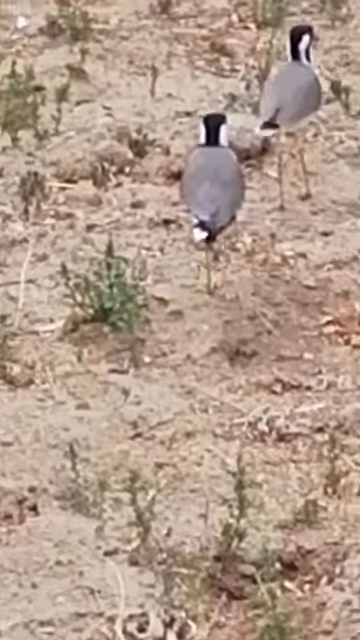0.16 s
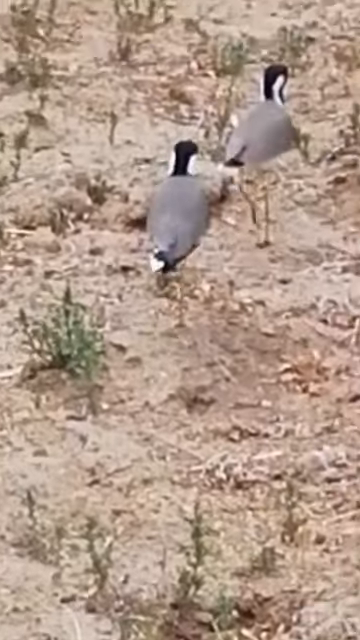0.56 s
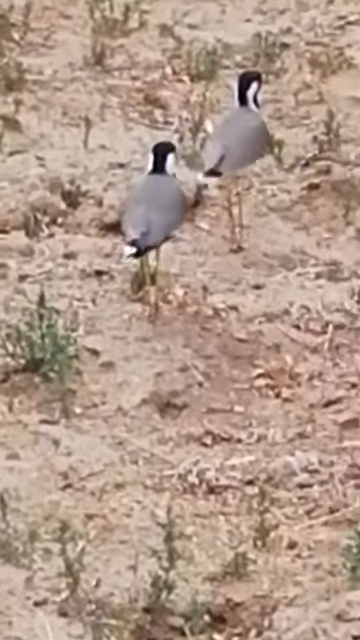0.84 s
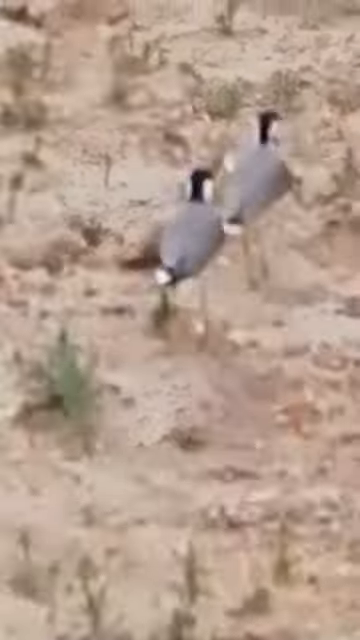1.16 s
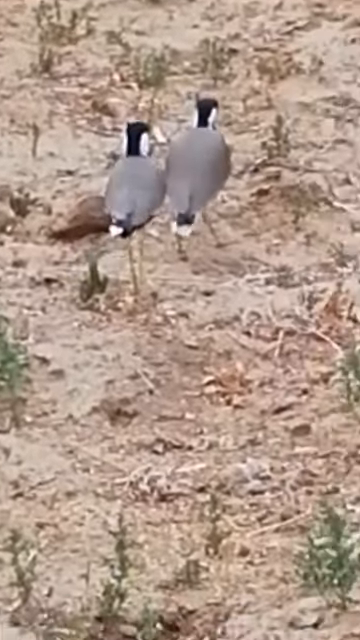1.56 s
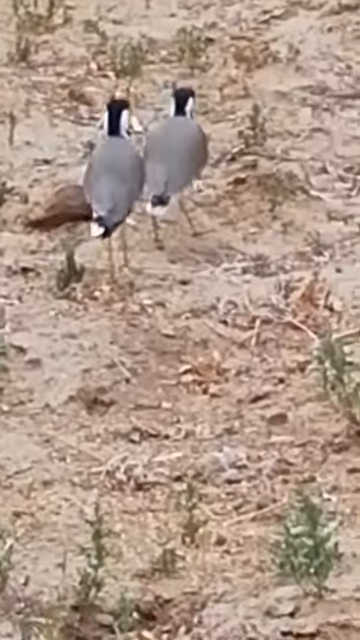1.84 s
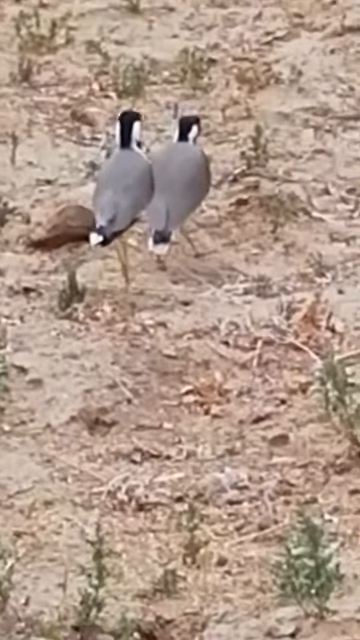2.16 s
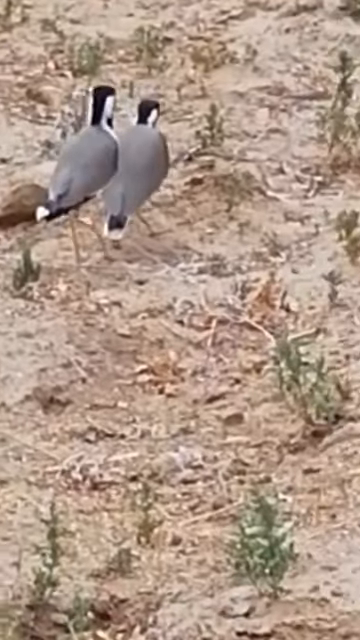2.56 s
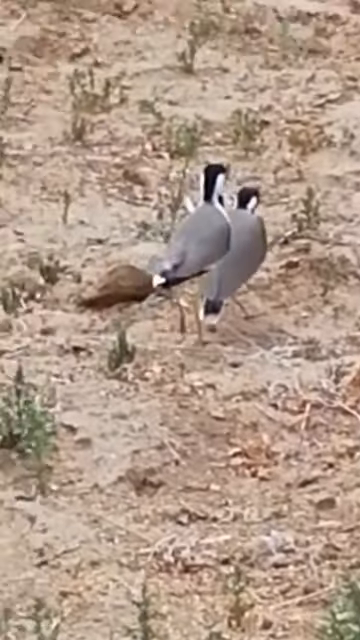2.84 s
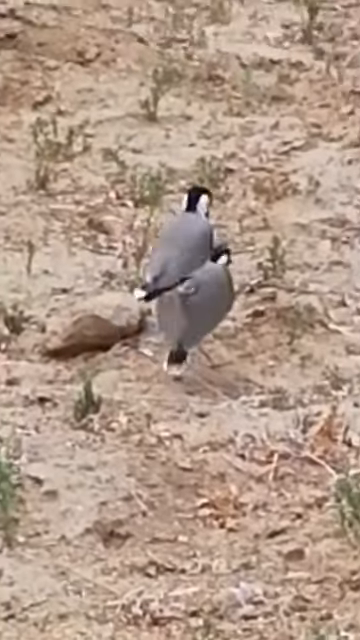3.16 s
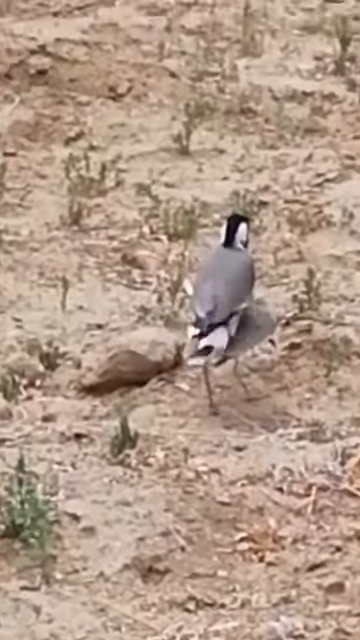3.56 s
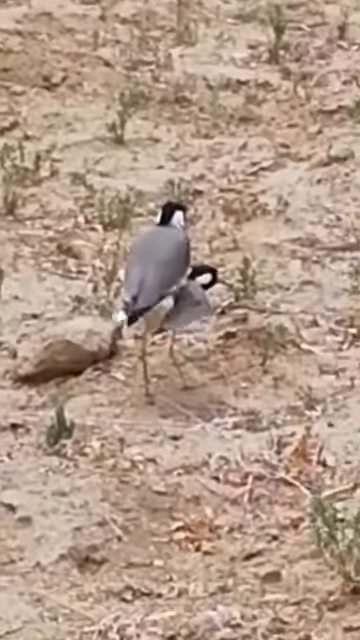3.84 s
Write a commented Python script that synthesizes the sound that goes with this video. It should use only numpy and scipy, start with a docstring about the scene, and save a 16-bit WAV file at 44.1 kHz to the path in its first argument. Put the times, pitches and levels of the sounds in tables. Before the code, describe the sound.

Lapwing calls on open dry ground: after brief silence, a faint kek, then steady rapid ticks swelling with sharper keks between, ending in brighter pips; faint distant chirps, soft air hush and wind rumbling on the microphone.

```python
"""After a short silence, wind and open-air hush start abruptly, with a sharp lapwing 'kek' close behind.
Lapwing ticks grow louder with keks between them, then quick pips take over; other birds whistle and chirp
farther off while gusts rumble. Lapwing calls are harmonic pulses and rasp through a throat filter, far birds
are wavering sine partials, wind is shaped noise with single low pushes; scattered taps make the echoes."""
import sys
import numpy as np
from scipy import signal
from scipy.fft import rfft, irfft
from scipy.io import wavfile
from scipy.ndimage import uniform_filter1d

SR = 44100
rng = np.random.default_rng(int(sys.argv[2]) if len(sys.argv) > 2 else 0)


def store_wav(level_fs):
    """Save 16-bit WAV to argv[1]."""
    pcm = np.round(np.clip(np.atleast_2d(level_fs), -1, 1) * 32767)
    wavfile.write(sys.argv[1], SR, pcm.T.astype(np.int16))


N = 176400
T = np.arange(N) / SR

# Echo decay of the open field. Each row: frequency in Hz, time to fall 60 dB in s.
FIELD_T60 = [(500, 0.35), (3000, 0.61), (5200, 0.64), (8000, 1), (15000, 0.23)]


def amp(db):
    """Decibels to gain."""
    return 10 ** (np.asarray(db) / 20)


def evened(x):
    """Scales to rms 1."""
    return x / np.sqrt(np.mean(x ** 2) + 1e-20)


def read(points, hz):
    """Interpolates a curve on a log-frequency axis."""
    f, value = np.transpose(points)
    return np.interp(np.log(hz + 1), np.log(f + 1), value)


def add(mix, start_s, sound):
    """Mixes a sound in at start_s, cut at the end of the mix."""
    part = mix[..., round(start_s * SR):][..., :sound.shape[-1]]
    part += sound[..., :part.shape[-1]]


def waver(size, hz):
    """Smooth random drift: noise of rms 1 under a Gaussian low-pass of width hz."""
    f = np.fft.rfftfreq(16384, 1 / SR)
    spectrum = rfft(rng.standard_normal(2 * len(f) - 2))
    return evened(irfft(spectrum * np.exp(-(f / hz) ** 2)))[:size]


def noise(points, same, patchy_db):
    """Stereo noise with a spectrum, a left-right likeness and drifting patches."""
    hz = np.fft.rfftfreq(2048, 1 / SR)
    a, b, c, d, patches = rng.standard_normal((5, len(hz), N // 512 + 5))
    likeness = np.clip(read(same, hz), -1, 1)[:, None]
    left = a + 1j * b
    right = likeness * left + np.sqrt(1 - likeness ** 2) * (c + 1j * d)
    patches = uniform_filter1d(patches, size=8, axis=1)  # over time
    patches = evened(uniform_filter1d(patches, size=14, axis=0))  # over frequency
    z = np.array([left, right]) * amp(read(points, hz)[:, None] + patchy_db * patches)
    return evened(signal.istft(z, nperseg=2048, noverlap=1536)[1][:, :N])


def echoes(x, t60):
    """Scattered reflections, different on each side, each band dying at its own speed."""
    kept = rng.standard_normal((2, SR)) * (rng.random((2, SR)) < .1)
    taps = kept * (np.arange(SR) > 60)
    hz, t, z = signal.stft(taps, SR, nperseg=256)
    decay = amp(-60 * t / read(t60, hz)[:, None])
    tail = signal.istft(z * decay, SR, nperseg=256)[1]
    band = abs(rfft(tail[0], SR))[2000:6000]  # 1 Hz bins: unit gain at 2-6 kHz
    tail = tail / np.sqrt(np.mean(band ** 2))
    return signal.fftconvolve(np.atleast_2d(x), tail, axes=1)[:, :N]


def wind():
    """Low buffeting noise that changes colour in the gusts, over the hush of open air."""
    # Gust level. Each row: time in s, level before trim in dB.
    gusts = [(0.45, -61), (0.93, -66.5), (1.04, -53.5), (1.06, -67), (1.59, -59), (1.62, -50.5),
             (1.77, -64.5), (1.96, -51.5), (2.01, -59), (2.41, -56), (2.47, -67), (2.56, -44.5),
             (2.67, -51), (2.74, -45), (2.77, -50.5), (2.86, -46), (2.9, -35), (2.94, -48), (3.06, -39.5),
             (3.08, -51.5), (3.12, -40.5), (3.24, -38.5), (3.31, -49.5), (3.36, -56.5), (3.47, -25.5),
             (3.5, -39), (3.6, -32), (3.64, -38), (3.67, -34.5), (3.81, -56.5), (3.83, -43.5), (4.0, -44.5)]
    # Rumble spectra, calm and gusty. Each row: frequency in Hz, relative level in dB.
    calm_spectrum = [(20, -9.5), (40, 7), (65, 7), (85, 4.5), (110, -10.5), (220, -15), (300, -29),
                     (500, -26), (1100, -69)]
    gusty_spectrum = [(20, -6.5), (40, -2), (62, 2.5), (100, -6.5), (150, -10), (240, -19), (330, -32.5),
                      (500, -45.5), (1000, -75), (3000, -90)]
    # Hush spectrum. Each row: frequency in Hz, relative level in dB.
    air_spectrum = [(100, 12.5), (300, 4.5), (600, -1), (1150, 3), (1700, -3), (2400, -5.5), (3500, -15.5),
                    (5000, -10), (7000, -13), (10000, -18.5), (15000, -20)]
    # Hush level. Each row: time in s, level in dB.
    air_level = [(.4, -73), (.7, -70), (1.0, -66), (1.45, -60.5), (2.1, -61.5), (2.8, -57.5), (3.5, -55.5),
                 (4, -58)]
    # Hush left-right likeness. Each row: frequency in Hz, correlation from -1 to 1.
    air_same = [(60, 0.99), (150, 1), (380, 0.28), (950, 0.66), (2380, 0.64), (5980, 0.22), (15000, -0.072)]
    calm_db, gusty_db, trim_db = -51.5, -37, 0.5
    level_db = np.interp(T, *np.transpose(gusts))
    gusty = np.clip((level_db - calm_db) / (gusty_db - calm_db), 0, 1)
    same = [(30, .97), (70, .93), (130, .7), (250, .2)]  # Hz, correlation
    rumble = np.sqrt(1 - gusty) * noise(calm_spectrum, same, patchy_db=1.5)
    rumble = rumble + np.sqrt(gusty) * noise(gusty_spectrum, same, patchy_db=3.0)
    rumble /= np.sqrt(uniform_filter1d((rumble ** 2).mean(0), size=3000))  # level then follows gusts
    hush = amp(np.interp(T, *np.transpose(air_level))) * noise(air_spectrum, air_same, patchy_db=1.92)
    return amp(level_db + trim_db) * rumble + hush


def voice(hz, envelope, throat, rasp_db, low_db, upper_db, fifth_db, shrill_db, pan_db):
    """Pulses from the syrinx, raspy and duller as the effort drops, ring the throat and beak."""
    # Left-right balance. Each row: frequency in Hz, left minus right in dB.
    ears = [(1000, 7.5), (4000, -0.5), (6000, 5), (7000, 4), (8500, -14.5), (11000, -11), (15000, -8.5)]
    jitter, jitter_hz, shimmer_db, dulling = 0.0045, 513, -0.1, 0.39  # jitter: rms fraction of pitch
    turns = np.cumsum(hz * (1 + jitter * waver(len(hz), jitter_hz))) / SR - .25
    effort = envelope / envelope.max()
    pulses = np.sqrt(2) * sum(effort ** (dulling * max(k - 3, 0)) * np.cos(2 * np.pi * k * turns)
                              for k in range(1, 14))
    hiss = rng.standard_normal(4096)[:len(hz)]
    rasp = amp(rasp_db) * np.std(pulses) * np.diff(hiss, prepend=0)
    shimmer = amp(shimmer_db * waver(len(hz), jitter_hz))
    drive = envelope * shimmer * (pulses + rasp)
    f = abs(np.fft.fftfreq(1024, 1 / SR))
    beak_db = np.interp(f / hz.max(), [2, 2.8, 3.1, 3.8, 4.1, 4.8, 6, 7],  # multiples of top pitch
                        [low_db, 0, 0, upper_db, upper_db, fifth_db, fifth_db, shrill_db])
    sides_db = np.outer([.5, -.5], pan_db + read(ears, f))
    log_gain = np.log(amp(read(throat, f) + beak_db + sides_db))
    minimum_phase = np.exp(signal.hilbert(log_gain).conj())
    ring = np.fft.ifft(minimum_phase).real[:, :len(f) // 2]
    return signal.fftconvolve(drive[None], ring, axes=1)


def bounce(note):
    """A close ground reflection, a little different on each side, makes the partials uneven."""
    bounce_db, longest_s = -10.5, .0009
    delays = (rng.uniform(.3, 1, 2) * longest_s * SR).astype(int)
    reflected = np.array([np.roll(side, d) for side, d in zip(note, delays)])
    return note + amp(bounce_db) * reflected


def kek(length_s, hz, db, low_db, upper_db, fifth_db, shrill_db, pan_db):
    """A sudden note whose pitch arches over an early peak, then drops as it fades."""
    # Voice colour. Each row: frequency in Hz, gain in dB.
    throat = [(300, -66), (1150, -26), (1600, 2.5), (2100, 1.5), (2450, -4), (3500, 0.5), (4700, -8.5),
              (6000, -11), (7200, -25), (8400, -22), (9700, -31), (11000, -30), (12300, -29), (13500, -50),
              (16000, -53)]
    rise_s, peak_s, fall_s, fall = 0.0019, 0.0091, 0.028, .21  # fall: pitch fraction lost fall_s past peak
    hold, fade_db, rasp_db, trim_db = 0.36, -14, -17, -0.37  # hold: fraction of length before the fade
    t = np.arange(0, length_s, 1 / SR)
    pitch_hz = hz * (1 - fall * ((t - peak_s) / fall_s) ** 2)
    fade = (np.maximum(t / length_s - hold, 0) / (1 - hold)) ** 2
    envelope = np.minimum(t / rise_s, 1) * amp(fade_db * fade)
    return amp(db + trim_db) * voice(pitch_hz, evened(envelope), throat, rasp_db,
                                     low_db, upper_db, fifth_db, shrill_db, pan_db)


def tick(hz, db, low_db, upper_db, pan_db):
    """A few pulses at constant pitch under a very fast exponential decay."""
    # Voice colour. Each row: frequency in Hz, gain in dB.
    throat = [(300, -78), (1100, -25), (1650, -7), (2150, -0.5), (2700, -14.5), (3300, 1.5), (4400, -13.5),
              (5500, -12.5), (6600, -13), (8000, -27.5), (11000, -56.5), (16000, -43)]
    hold_s, decay_s, length_s, rasp_db, trim_db = .0011, .00115, .005, -11, -0.94
    t = np.arange(0, 2 * length_s, 1 / SR)
    envelope = np.exp(-np.maximum(t - hold_s, 0) / decay_s)
    envelope = evened(envelope) / np.sqrt(2)  # energy of rms 1 over length_s
    return amp(db + trim_db) * voice(hz + 0 * t, envelope, throat, rasp_db,
                                     low_db, upper_db, upper_db, upper_db, pan_db)


def lapwings():
    """All keks, ticks and pips, with the scatter from the ground and a faint echo of the field."""
    # Each row: start in s, pitch in Hz, level before trim in dB, extra low partials in dB,
    # extra upper partials in dB, left minus right in dB.
    tick_rows = [(0.5317, 1144, -71, 9, 11, -6), (0.6098, 1147, -73.5, 12.0, 10, -3),
                 (0.6869, 1176, -64, 7.5, 7.5, -5), (0.7635, 1133, -68.0, 9.0, 7, -5),
                 (0.845, 1153, -64.0, 5.5, 7, -6), (0.9237, 1160, -64.5, 6.5, 4.5, -4),
                 (1.0022, 1150, -60, 3, 2, -6.0), (1.0808, 1145, -56.0, 3.0, 3.5, -5),
                 (1.1663, 1170, -56.5, 1.0, -3, -5), (1.2465, 1170, -53.5, 1, 0, -3),
                 (1.3311, 1180, -48.0, -0.5, 1, -8), (1.4124, 1190, -48, 2, 0, -2.0),
                 (1.495, 1196, -57, 11.5, 3.5, -5.0), (1.577, 1180, -55, 9, 4, -2),
                 (1.6568, 1150, -58.5, 5.5, 1, -5), (1.7378, 1150, -53.5, 2.0, 3, -5.5),
                 (1.814, 1145, -54.5, 2, 4.5, -3.5), (1.8926, 1160, -49.5, -1, 3.5, -6.5),
                 (1.9735, 1145, -46.5, -3, 4, -5), (2.0532, 1160, -44.5, -5.5, 2, -4),
                 (2.1339, 1130, -52.5, -1.5, 4, -5), (2.2148, 1126, -47, -3, 5.5, -5),
                 (2.2934, 1143, -43.5, -4.5, 4, -2), (2.3755, 1127, -45, -3.5, 3.5, -4.5),
                 (2.4522, 1132, -44, -4.5, 3.5, -4.0), (2.6129, 1132, -40.0, -5, 1.5, -4.5),
                 (2.6919, 1090, -40, -6.5, 3.5, -5.5), (2.7721, 1007, -41.5, -9, 3.5, -2),
                 (2.8568, 1048.0, -38.5, -4, 0.5, -1.0), (2.94, 1056.0, -41, -5, 3.0, -2.5),
                 (3.0235, 1040, -38, -6, -1.5, -4)]
    # Each row: start in s, length in s, top pitch in Hz, level before trim in dB, extra 2nd partial
    # and below in dB, extra 4th in dB, extra 5th in dB, extra shrillness in dB, left minus right in dB.
    kek_rows = [(.4196, 0.038, 1119, -59.5, -5, 2, -1, 0.5, -1),
                (1.0206, 0.043, 1205, -45.5, -2, 0.5, 4.5, -2, -3.5),
                (1.3689, 0.041, 1219, -42, -3, -4, 2, 0, -2.5),
                (2.175, 0.04, 1235, -43.5, 1.5, 3, -4.5, 4, -5),
                (2.5301, 0.039, 1206, -40.5, -1, -0.5, -3, 0, -4.5),
                (3.16, 0.04, 1134, -41.5, -8, 4.5, -1.5, 0, -5)]
    # Each row: start in s, length before the added rise time in s, pitch in Hz, level before trim in dB,
    # extra low partials in dB, extra upper partials in dB, left minus right in dB.
    pip_rows = [(3.103, 0.0087, 1075.0, -33.5, -3.5, -7.5, -4),
                (3.188, 0.0096, 1106, -34, -3.5, -9.5, -2.5), (3.278, 0.01, 1236, -42.0, 2.5, -4.5, -0.5),
                (3.2938, 0.013, 1160, -48.5, 7, -3, -1.0), (3.3812, 0.011, 1318, -43, 1.5, -3.5, -4),
                (3.3924, 0.016, 1250, -55.5, 14, 7.5, 1.5), (3.481, 0.0066, 1218, -54.5, 6, 5.5, -3),
                (3.4917, 0.025, 1191, -56.5, 11, 5.5, -3), (3.585, 0.01, 1324, -36.5, -4.5, -7, -6),
                (3.5977, 0.02, 1220, -46.5, 4, 2, 1.5), (3.7029, 0.017, 1300, -32.5, -10.5, -4.5, -6),
                (3.717, 0.022, 1212, -49, 9.5, 5, -5), (3.827, 0.0086, 1288, -45, -3.5, -7, -10),
                (3.842, 0.0065, 1349, -41.5, -2, -3.0, -6.0), (3.848, 0.021, 1184, -56.5, 11, 4, -3),
                (3.948, 0.015, 1408, -39, -2.5, -6, -8.5), (3.9587, 0.0054, 1412, -36.5, -1, -0.5, -1.5),
                (3.9714, 0.013, 1425, -37.5, -2, 1, -5), (3.9861, 0.029, 1393, -37.5, -1.0, 0, -7)]
    ground_db, ground_t60_s, field_db, tick_echo_db = -7.5, 0.054, -16.5, -2.5
    treble_above_hz, treble_db = 8500, 2.5  # rough soil scatters the treble most
    ticks, notes = np.zeros((2, 2, N))
    for track, call, rows in ((ticks, tick, tick_rows), (notes, kek, kek_rows), (notes, pip, pip_rows)):
        for start_s, *row in rows:
            add(track, start_s, bounce(call(*row)))
    thrown = notes + amp(tick_echo_db) * ticks
    high_pass = signal.butter(4, treble_above_hz, "high", fs=SR, output="sos")
    treble = signal.sosfilt(high_pass, notes)
    scatter = echoes(amp(ground_db) * thrown + amp(treble_db) * treble, [(1, ground_t60_s)])
    return ticks + notes + scatter + amp(field_db) * echoes(thrown, FIELD_T60)


def whistle(curve, overtones_db, unsteady, flutter_db):
    """A wavering, fluttering tone of a few partials along a pitch and level curve."""
    top_hz = 10220  # the air absorbs the far birds' treble
    s, hz, db = np.transpose(curve)
    t = np.arange(s[0], s[-1], 1 / SR)
    pitch_hz = np.interp(t, s, hz)
    turns = np.cumsum(pitch_hz * (1 + unsteady * waver(len(t), hz=394))) / SR
    tone = 0
    for k, level_db in enumerate(overtones_db, 1):
        absorbed = 1 + (pitch_hz * k / top_hz) ** 10
        tone = tone + amp(level_db) * np.sin(2 * np.pi * k * turns) / absorbed
    flutter = evened(amp(flutter_db * waver(len(t), hz=159)))
    out = np.zeros(N)
    add(out, s[0], evened(tone) * flutter * amp(np.interp(t, s, db)))
    return out


def far_birds():
    """A few small chirps and one mostly rising whistle, with long echoes."""
    # Rising whistle. Each row: time in s, pitch in Hz, level before mix gain in dB.
    whistle_curve = [(2.692, 3150, -51), (2.703, 3100, -48), (2.72, 3354, -46.5), (2.737, 3565, -39),
                     (2.752, 3910, -41), (2.764, 5010, -39.5), (2.778, 5240, -36), (2.79, 5020, -52),
                     (2.8, 4660, -47)]
    # Whistle partials from the fundamental up: relative level in dB.
    whistle_partials_db = [-5.5, -24.5, -20.5]
    # Chirps, one list each. Each row: time in s, pitch in Hz, level in dB.
    chirp_curves = [
        [(3.644, 7180, -62), (3.651, 5840, -45.5), (3.656, 4720, -45.5), (3.664, 5270, -59), (3.671, 5550, -56),
         (3.677, 3130, -59), (3.695, 2690, -74)],
        [(3.759, 6030, -54), (3.763, 5650, -67), (3.768, 3550, -55), (3.777, 3360, -51), (3.783, 3400, -68)],
        [(1.21, 1480, -70), (1.26, 1473, -66), (1.3, 1472, -65), (1.33, 1460, -83)],
    ]
    dry_db, scatter_db, whistle_wet_db, chirp_wet_db = -5.5, 2.5, -4, 0
    loud = whistle(whistle_curve, whistle_partials_db, unsteady=.03, flutter_db=4)
    small = sum(whistle(curve, [-6, -32, -24], unsteady=0.0029, flutter_db=1.5)
                for curve in chirp_curves)
    scatter = amp(scatter_db) * echoes(loud, [(1, 0.18)])
    field = echoes(amp(whistle_wet_db) * loud + amp(chirp_wet_db) * small, FIELD_T60)
    return amp(dry_db) * loud + small + scatter + field


def buffets():
    """Each eddy gives the microphone one short push, a Ricker pulse."""
    # Single wind buffets. Each row: centre time in s, pitch in Hz, peak in dB.
    pushes = [(2.55, 104, -37.5), (2.902, 78, -31.5), (3.197, 108, -26), (3.236, 60, -27), (3.472, 84, -29),
              (3.6, 87.5, -22), (3.673, 88, -33)]
    out, t = np.zeros(N), np.arange(-.03, .03, 1 / SR)
    for s, hz, db in pushes:
        u = (np.pi * hz * t) ** 2
        add(out, s + t[0], amp(db) * (1 - 2 * u) * np.exp(-u))
    return out


def pip(length_s, hz, db, low_db, upper_db, pan_db):
    """A clipped note whose pitch sags as it fades."""
    # Voice colour. Each row: frequency in Hz, gain in dB.
    throat = [(300, -45), (1250, -24), (1700, -19.5), (2500, -3.5), (3700, -3.5), (5000, -8), (6200, -11),
              (7400, -22.5), (8800, -33), (11400, -31), (13000, -42), (16000, -44)]
    rise_s, sag_per_s, fade_db, rasp_db, trim_db = 0.0026, 5.75, -10.5, -5, 0.87
    t = np.arange(0, length_s + rise_s, 1 / SR)
    edges = np.clip(np.minimum(t, t[-1] - t) / rise_s, 0, 1)
    envelope = edges * amp(fade_db * (t / length_s) ** 3)
    pitch_hz = hz * (1 - sag_per_s * t ** 2 / length_s)
    return amp(db + trim_db) * voice(pitch_hz, evened(envelope), throat, rasp_db,
                                     low_db, upper_db, upper_db, upper_db, pan_db)


def scene():
    """Wind, lapwings and far birds; the far birds sit slightly left."""
    far_pan_db = 1  # left minus right
    far = far_birds() * amp(np.array([[.5], [-.5]]) * far_pan_db)
    return wind() + lapwings() + far + buffets()


def record(dry):
    """The sound starts after a moment of silence, under a steep low-pass."""
    silent_until_s, fade_in_s, edge_hz = .392, 0.0015, 15800
    opened = dry * np.clip((T - silent_until_s) / fade_in_s, 0, 1)
    low_pass = signal.firwin(511, edge_hz, window=("kaiser", 9), fs=SR)
    return signal.oaconvolve(opened, low_pass[None], "same")


dry = scene()
out = record(dry)
store_wav(out)
```